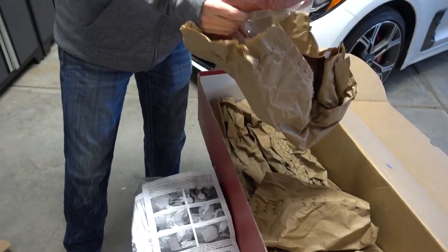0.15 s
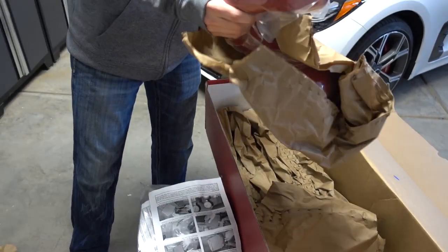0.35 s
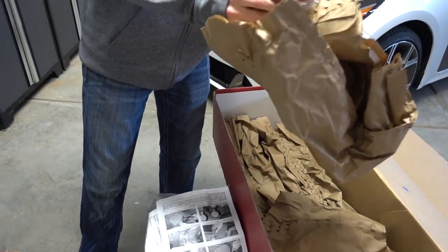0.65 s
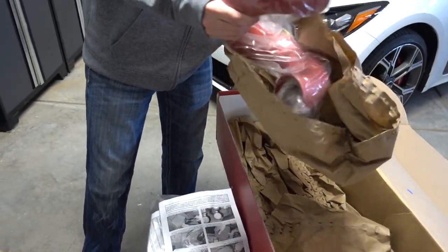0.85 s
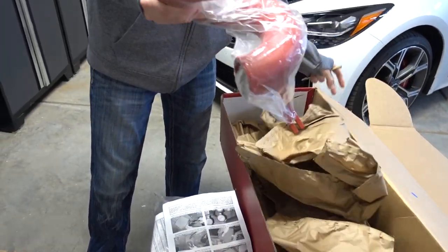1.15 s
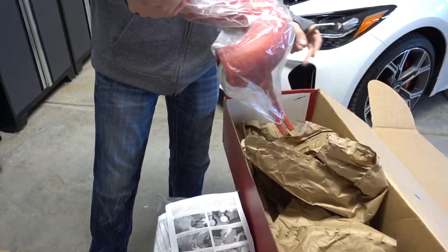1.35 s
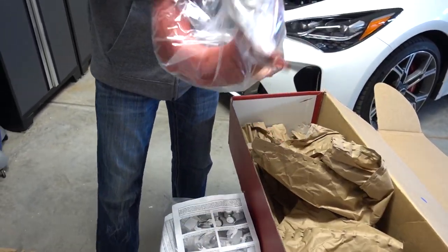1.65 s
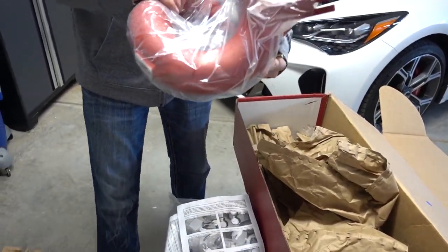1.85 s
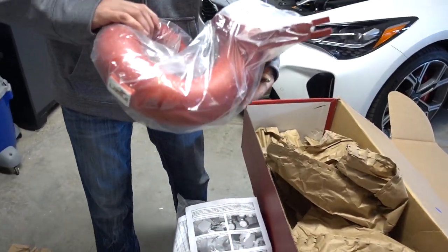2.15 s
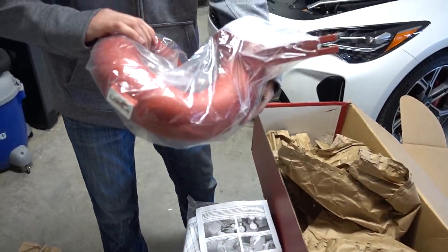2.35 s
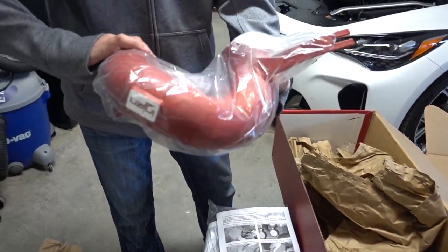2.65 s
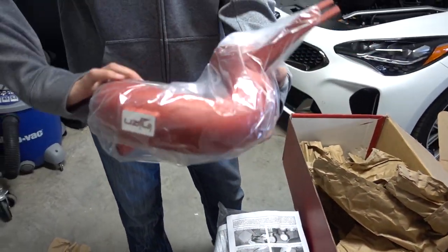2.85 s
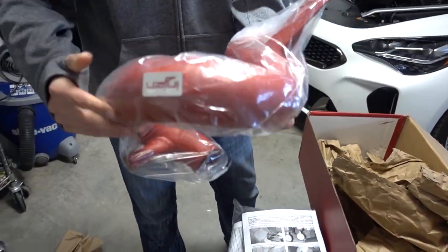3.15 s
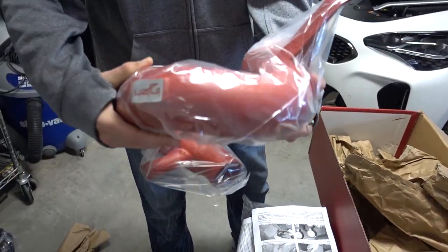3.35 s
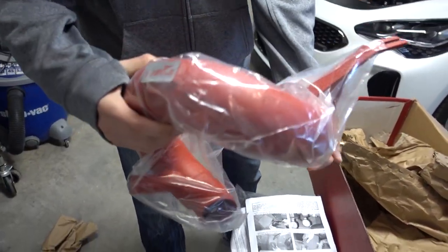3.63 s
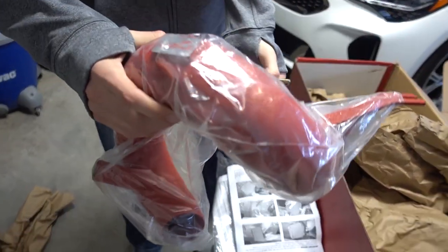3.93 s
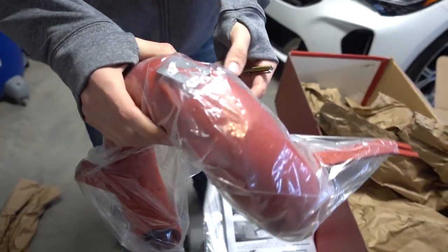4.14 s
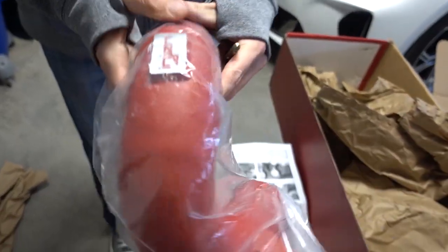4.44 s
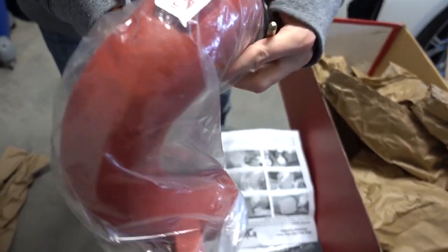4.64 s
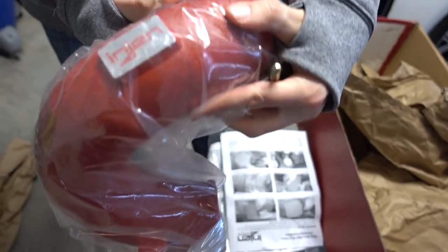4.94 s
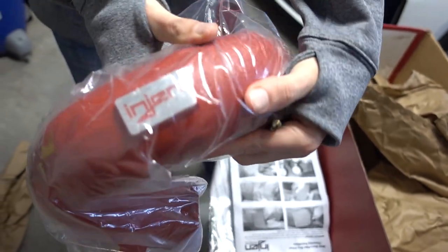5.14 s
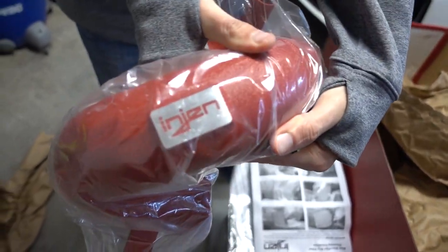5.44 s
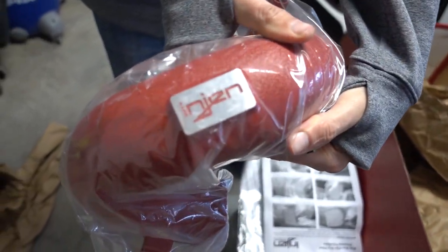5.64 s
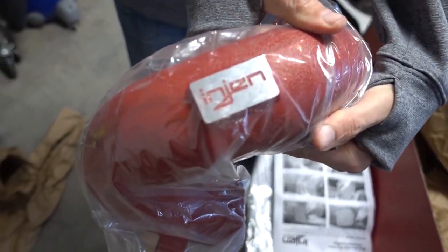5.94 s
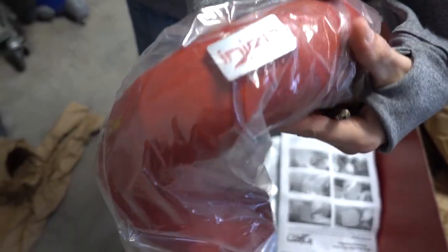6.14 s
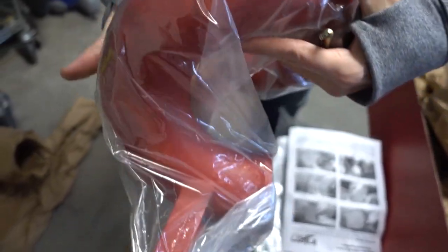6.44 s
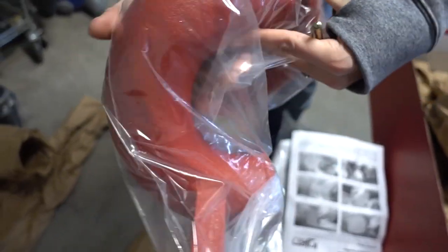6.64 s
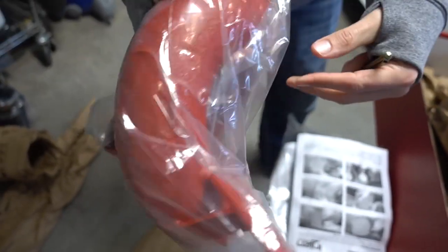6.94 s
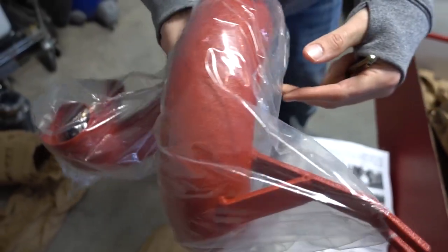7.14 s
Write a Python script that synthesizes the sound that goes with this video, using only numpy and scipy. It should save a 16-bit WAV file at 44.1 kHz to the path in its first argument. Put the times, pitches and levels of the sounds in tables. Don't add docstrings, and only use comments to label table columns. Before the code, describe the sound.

A close stereo pickup in a garage with a hard concrete floor and a short, dull reverberation. From 0 to about 1.1 s stiff packing paper is pulled off a pipe: loud, dense, coarse crackle with low-pitched snaps, surging repeatedly, with a slightly hollow air-pocket colour around 0.6 and 0.9 s. Soft thumps at about 1.2 and 1.3 s land in a cardboard box, which hums briefly; the rustle dies away by 1.6 s. Much quieter, thin plastic film ticks and crinkles from 1.7 to 2.7 s, grows brighter around 3.0 to 3.5 s, and nearly stops near 4 s. Crinkling resumes from 4.3 to 5.3 s, with another burst at 5.6 s and a lull just before 6 s. A firm twist brings the sharpest plastic snaps at 6.3 and 6.6 to 6.8 s, with slight dull bumps, a last snap near 7.1 s, then sparse ticks. Faint motor hum and air rumble continue throughout.

```python
import sys
import numpy as np
from scipy import signal
from scipy.fft import rfft, irfft, next_fast_len
from scipy.io import wavfile
from scipy.ndimage import uniform_filter1d

SR = 44100
rng = np.random.default_rng(int(sys.argv[2]) if len(sys.argv) > 2 else 0)


def level_to_linear(level):
    exponent = np.asarray(level, float) / 20
    return 10 ** exponent


def inscribe(sig):
    pcm = np.round(np.clip(np.atleast_2d(sig).T, -1, 1) * 32767)
    wavfile.write(sys.argv[1], SR, pcm.astype(np.int16))


N = 321224
PAPER_GONE_S = 1.6


def rms_one(x):
    return x / np.sqrt(np.mean(x ** 2) + 1e-20)


def at_hz(points, hz):
    point_hz, point_db = np.array(points)[:, 0], np.array(points)[:, 1]
    return np.interp(np.log(hz), np.log(point_hz), point_db)


def drift(rate):
    r = np.exp(-40 * np.pi * rate / SR)
    slow = signal.lfilter([1], [1, -2 * r, r * r], rng.standard_normal(N // 20 + 2002))[2000:]
    return np.interp(np.arange(N) / 20, np.arange(len(slow)), rms_one(slow))


def resonate(x, hz, width_hz):
    r = np.exp(-np.pi * width_hz / SR)
    poles = [1, -2 * r * np.cos(2 * np.pi * hz / SR), r * r]
    return signal.lfilter([(1 - r * r) / 2, 0, (r * r - 1) / 2], poles, x)


def coloured(x, db_at):
    size = next_fast_len(N)
    hz = np.maximum(np.arange(size // 2 + 1) * SR / size, 10)
    return irfft(rfft(x, size) * level_to_linear(db_at(hz)), size)[..., :N]


def handling():
    # peak t/s, crackle level/dB, rise [s per 10 dB], fall [s per 10 dB], weight/dB
    pulls = [(.02, -21, .012, .03, -4), (.06, -29, .05, .25, 0), (.236, -25.5, .08, .085, 3),
             (.33, -35, .1, .12, -3), (.492, -28, .004, .09, 1), (.6, -26, .06, .08, 2),
             (.68, -24, .03, .15, 1), (.77, -28, .1, .2, -4), (.908, -22, .2, .18, -4),
             (1.16, -27.5, .05, .22, -5), (1.33, -31, .04, .1, -5), (1.41, -33, .3, .092, -3),
             (1.688, -49, .02, .07, 2)]
    grips = [(1.849, -47, .06, .09, 4), (1.93, -46, .02, .07, -2), (2.06, -47, .1, .05, 1),
             (2.275, -46, .12, .035, -2), (2.45, -54, .8, .25, 3), (2.6, -45, .13, .16, -2),
             (2.625, -41, .025, .05, 7), (3.061, -34, .11, .16, -1), (3.187, -36, .03, .06, 1),
             (3.38, -35, .1, .2, 0), (4.115, -65, .02, .1, -9), (4.153, -53.5, .004, .16, 9),
             (4.44, -41.5, .11, .3, 0), (4.554, -38, .08, .12, 2), (4.775, -36.5, .06, .2, -1),
             (5.089, -43, .5, .3, 0), (5.163, -39, .03, .03, 0), (5.48, -48, .03, .2, 4),
             (5.55, -39, .025, .14, 1), (5.964, -54, .014, .025, 2), (6.077, -39.5, .02, .06, -4),
             (6.198, -43, .1, .2, 0), (6.44, -36.5, .03, .8, 3), (6.55, -36, .12, .05, 0),
             (6.61, -31, .02, .06, 2), (6.7, -31, .13, .15, 0), (6.824, -34.5, .2, .09, 1),
             (7.25, -52, 1.5, .8, 0)]
    move_s = .55
    box_landing_s, box_body_db = 1.1, 8
    t = np.arange(0, N + 64, 64) / SR
    s, db, rise, fall, weight = np.transpose(pulls + grips)[:, :, None]
    rising = 10 * np.maximum(s - t, 0) / rise
    fading = 10 * np.maximum(t - s, 0) / fall
    lead = level_to_linear(6 * (db - rising - fading - 10 * ((t - s) / move_s) ** 4)) + 1e-40
    total = lead.sum(0)
    paper = np.arange(len(s))[:, None] < len(pulls)
    body = np.where(paper, -4.5 + box_body_db * (s > box_landing_s), -5.5) + weight
    sizzle = np.where(paper, -1.5, 1.5) - .9 * weight
    sizzle = sizzle - .5 * np.minimum(fading, 40) - .3 * np.minimum(rising, 40)
    level = 20 / 6 * np.log10(total)
    curves = (level, (lead * body).sum(0) / total, (lead * sizzle).sum(0) / total)
    return [np.interp(np.arange(N) / SR, t, curve) for curve in curves]


def paper_creases():
    # t/s, peak level/dB, f/Hz, length/ms
    paper_flips = [(0.008, -13, 3000, 0.85), (0.0209, -13, 2800, 0.75), (0.0395, -16, 3100, 0.77),
                   (0.0561, -8, 3600, 0.32), (0.1005, -17, 2600, 0.48), (0.1613, -13, 3200, 0.39),
                   (0.1841, -14, 2700, 0.6), (0.1919, -17, 3000, 0.48), (0.2098, -9, 2100, 0.55),
                   (0.2151, -7, 2800, 0.8), (0.2323, -12, 2400, 0.46), (0.2822, -19, 2200, 0.83),
                   (0.3022, -19, 2200, 0.31), (0.3398, -19, 2900, 0.33), (0.4718, -29, 2400, 0.83),
                   (0.4898, -18, 3200, 0.58), (0.5058, -20, 4700, 0.51), (0.5101, -18, 3300, 0.54),
                   (0.5545, -14, 4500, 0.58), (0.5825, -13, 2700, 0.37), (0.5993, -11, 2600, 0.92),
                   (0.6051, -11, 4200, 0.46), (0.6299, -12, 3700, 0.51), (0.6692, -12, 2400, 0.61),
                   (0.6737, -11, 2000, 0.83), (0.6956, -11, 3600, 0.55), (0.7289, -13, 2800, 0.33),
                   (0.7665, -12, 3600, 0.41), (0.7788, -13, 5600, 0.45), (0.7925, -12, 2700, 0.33),
                   (0.8389, -9, 5400, 0.36), (0.8719, -12, 3900, 0.39), (0.8781, -12, 5500, 0.42),
                   (0.9366, -8, 5400, 0.24), (0.9552, -9, 6100, 0.27), (0.9684, -11, 6600, 0.62),
                   (1.0007, -14, 5700, 0.65), (1.3153, -21, 3700, 0.7), (1.3824, -20, 3800, 0.6),
                   (1.422, -22, 3600, 0.53), (1.4419, -27, 2400, 0.91), (1.4971, -27, 4500, 0.33),
                   (1.5043, -29, 3800, 0.53), (1.5386, -32, 2700, 0.48)]
    return paper_flips


def film_creases():
    # t/s, peak level/dB, f/Hz, length/ms
    film_flips = [(6.0077, -36, 6200, 0.43), (6.0224, -39, 3700, 0.51), (6.0408, -27, 3500, 0.5),
                  (6.0543, -26, 5800, 0.18), (6.0641, -15, 6100, 0.19), (6.0844, -19, 4900, 0.23),
                  (6.1181, -25, 4800, 0.27), (6.1285, -22, 8300, 0.3), (6.1429, -20, 8000, 0.25),
                  (6.1463, -19, 10000, 0.31), (6.1539, -18, 5200, 0.32), (6.1774, -24, 4800, 0.5),
                  (6.2412, -29, 5800, 0.29), (6.2579, -17, 6600, 0.27), (6.283, -22, 7500, 0.18),
                  (6.2942, -19, 5700, 0.79), (6.2986, -16, 5200, 0.23), (6.3148, -8, 6800, 0.2),
                  (6.3425, -25, 3400, 0.61), (6.3496, -22, 6900, 0.5), (6.3838, -18, 4300, 0.26),
                  (6.4033, -21, 5500, 0.11), (6.4347, -19, 3300, 0.68), (6.4485, -13, 5900, 0.26),
                  (6.4519, -18, 6000, 0.44), (6.5988, -8, 5800, 0.22), (6.6222, -9, 7900, 0.21),
                  (6.6526, -10, 5000, 0.24), (6.6736, -9, 6500, 0.23), (6.6948, -13, 5000, 0.38),
                  (6.7307, -9, 4400, 0.33), (6.7431, -13, 4200, 0.48), (6.7792, -13, 5500, 0.37),
                  (6.7871, -12, 3800, 0.27), (6.7987, -12, 2900, 0.31), (6.8023, -11, 3100, 0.33),
                  (6.8154, -14, 4900, 0.27), (6.8936, -16, 4100, 0.34), (6.9215, -26, 3900, 0.35),
                  (7.0024, -18, 5500, 0.31), (7.0086, -23, 8300, 0.12), (7.0439, -18, 4400, 0.51),
                  (7.0692, -8, 5800, 0.3), (7.0978, -32, 5500, 0.33), (7.1326, -33, 3500, 0.46),
                  (7.1542, -27, 5800, 0.3), (7.1915, -26, 5100, 0.33), (7.234, -32, 5800, 0.23),
                  (7.255, -32, 3300, 0.36), (7.2787, -21, 7500, 0.3),
                  (5.0031, -20, 4600, 0.3), (5.0152, -23, 5100, 0.43), (5.0199, -23, 4500, 0.24),
                  (5.0407, -23, 6500, 0.35), (5.0437, -21, 4800, 0.27), (5.0766, -15, 5400, 0.23),
                  (5.0852, -22, 6000, 0.32), (5.0989, -16, 6500, 0.28), (5.1193, -19, 8500, 0.42),
                  (5.1373, -20, 6300, 0.16), (5.1463, -20, 4200, 0.32), (5.1665, -21, 5500, 0.35),
                  (5.177, -22, 7800, 0.34), (5.2163, -22, 6500, 0.25), (5.23, -22, 5200, 0.51),
                  (5.2375, -27, 7800, 0.68), (5.2443, -24, 8200, 0.23), (5.2679, -12, 6600, 0.18),
                  (5.3195, -21, 7000, 0.18), (5.3419, -31, 3900, 0.76), (5.352, -28, 4700, 0.55),
                  (5.3958, -25, 7800, 0.23), (5.418, -27, 5200, 0.35), (5.4316, -21, 10400, 0.19),
                  (5.4637, -32, 3500, 0.7), (5.5292, -29, 4900, 0.85), (5.5749, -17, 8500, 0.24),
                  (5.5793, -20, 4700, 0.33), (5.585, -16, 6600, 0.37), (5.6242, -22, 5300, 0.28),
                  (5.638, -22, 6500, 0.3), (5.654, -22, 4800, 0.38), (5.7018, -27, 2600, 0.59),
                  (5.7134, -24, 8200, 0.3), (5.7672, -36, 3800, 0.64), (5.7833, -35, 3700, 0.42),
                  (5.7871, -22, 6700, 0.37), (5.8088, -28, 3200, 0.2), (5.8842, -36, 3800, 0.22),
                  (5.9546, -34, 3300, 0.48),
                  (2.8592, -36, 2800, 0.69), (2.8714, -26, 6800, 0.23), (2.8917, -32, 5200, 0.35),
                  (2.9122, -31, 5000, 0.62), (2.9175, -26, 4300, 0.36), (2.9329, -27, 6200, 0.46),
                  (2.9597, -28, 6200, 0.45), (2.9851, -19, 6200, 0.17), (3.0181, -19, 5500, 0.24),
                  (3.057, -19, 5700, 0.6), (3.1157, -22, 6400, 0.62), (3.1333, -21, 6800, 0.44),
                  (3.1368, -18, 7800, 0.29), (3.189, -23, 7500, 0.43), (3.2277, -23, 7600, 0.24),
                  (3.2379, -26, 4300, 0.34), (3.2477, -25, 7000, 0.24), (3.3017, -18, 5900, 0.23),
                  (3.3082, -27, 5500, 0.39), (3.3561, -18, 6500, 0.22), (3.3628, -21, 8100, 0.62),
                  (3.3764, -20, 3400, 0.28), (3.4687, -15, 9200, 0.27), (3.4744, -25, 4500, 0.41),
                  (3.4801, -24, 3300, 0.51), (3.5383, -26, 4000, 0.33), (3.5891, -30, 4900, 0.4),
                  (3.662, -34, 3500, 0.49), (3.6773, -32, 3000, 0.36), (3.7023, -37, 3500, 0.64),
                  (3.7658, -29, 4400, 0.19), (3.7765, -31, 3200, 0.4), (3.8472, -39, 2400, 0.55),
                  (3.8647, -37, 5100, 0.76), (3.8705, -30, 3300, 0.31), (3.9139, -46, 2700, 0.6),
                  (1.6834, -32, 3500, 0.8), (1.7311, -30, 4000, 0.35), (1.8465, -23, 6400, 0.13),
                  (1.8918, -29, 4000, 0.45), (1.9176, -19, 7500, 0.24), (1.9207, -19, 7700, 0.24),
                  (1.9251, -27, 5500, 0.28), (1.9511, -27, 5200, 0.35), (1.9549, -27, 8100, 0.23),
                  (1.9698, -24, 6900, 0.17), (1.9959, -21, 4400, 0.33), (2.0037, -24, 3400, 0.33),
                  (2.0287, -19, 6500, 0.24), (2.0357, -29, 8000, 0.32), (2.0525, -25, 5700, 0.5),
                  (2.0572, -27, 3200, 0.36), (2.0797, -28, 6900, 0.26), (2.124, -19, 6800, 0.37),
                  (2.1312, -20, 8000, 0.13), (2.164, -33, 4600, 0.28), (2.2458, -33, 7000, 0.55),
                  (2.2674, -27, 4200, 0.29), (2.2736, -27, 7300, 0.43), (2.3182, -25, 4300, 0.21),
                  (2.3297, -29, 3000, 0.33), (2.3557, -29, 8200, 0.17), (2.4121, -30, 4500, 0.4),
                  (2.492, -32, 3700, 0.34), (2.5149, -28, 4000, 0.34), (2.5309, -26, 4600, 0.3),
                  (2.5668, -21, 5500, 0.15), (2.5978, -26, 6700, 0.33), (2.6204, -21, 3000, 0.34),
                  (2.6412, -20, 7000, 0.27), (2.6991, -25, 4000, 0.35), (2.741, -28, 3900, 0.37),
                  (4.0031, -49, 2300, 0.72), (4.1512, -31, 3900, 0.52), (4.1581, -38, 4200, 0.94),
                 (4.2663, -38, 5000, 0.9), (4.2864, -36, 4700, 0.44), (4.3094, -38, 6900, 0.71),
                 (4.3143, -34, 4700, 0.27), (4.346, -32, 3500, 0.46), (4.3511, -30, 6300, 0.55),
                 (4.3866, -28, 6100, 0.42), (4.4027, -25, 10900, 0.42), (4.412, -25, 4400, 0.38),
                 (4.4651, -23, 7400, 0.34), (4.4766, -23, 5100, 0.42), (4.4873, -24, 3100, 0.59),
                 (4.5094, -25, 3400, 0.27), (4.5335, -18, 5100, 0.23), (4.543, -22, 5600, 0.33),
                 (4.5488, -18, 4900, 0.43), (4.5589, -21, 5700, 0.4), (4.5775, -20, 5500, 0.37),
                 (4.6083, -25, 5100, 0.18), (4.6806, -34, 2400, 0.59), (4.7071, -32, 5700, 0.56),
                 (4.7143, -26, 3200, 0.29), (4.7478, -20, 3300, 0.29), (4.7663, -20, 6200, 0.57),
                 (4.7756, -15, 5000, 0.4), (4.8072, -20, 4300, 0.3), (4.8332, -16, 4200, 0.29),
                 (4.8641, -17, 6200, 0.21), (4.8895, -16, 6600, 0.31), (4.9669, -24, 4000, 0.5),
                 (4.9979, -21, 8000, 0.25),
                  (6.495, -21, 4500, .9), (6.519, -19, 4400, .6), (6.531, -21, 6500, .6),
                   (6.552, -19, 5200, .7), (6.589, -20, 5000, .6)]
    return film_flips


def small_creases(level_db):
    per_s, facet_octaves = 100, .5
    luck = rng.random((round(per_s * N / SR), 5))
    s = luck[:, 0] * (N - 1) / SR
    peak_db = -34 + (level_db[(s * SR).astype(int)] + 40) - 2.3 * np.log(luck[:, 1] + .1)
    facet_hz = np.where(s < PAPER_GONE_S, 2700, 5000)
    hz = facet_hz * 2 ** (2 * facet_octaves * (luck[:, 2] + luck[:, 3] - 1))
    length_ms = .25 + .7 * luck[:, 4]
    return list(zip(s, peak_db, np.clip(hz, 1000, 10000), length_ms))


def snaps(table, q, tear, edge_db, gain_db):
    clean_flip_ms = .17
    out, t = np.zeros((2, N + 600)), np.arange(600) / SR
    lucks = rng.random((len(table), 3))
    noises = rng.standard_normal((len(table), 600))
    for (s, peak_db, hz, ms), luck, noise in zip(table, lucks, noises):
        tear_s = tear * max(ms - clean_flip_ms, .02) / 1000
        push = .5 * noise * np.exp(-t / tear_s)
        push[0] = 1
        facet = resonate(resonate(push, .85 * hz, hz / q), hz, 1.1 * hz)
        edge = resonate(resonate(push, min((1.6 + luck[0]) * hz, 14000), 4000), 11000, 16000)
        edge_gain = level_to_linear(edge_db - 6.0 * luck[2])
        snap = facet / np.abs(facet).max() - edge_gain * edge / np.abs(edge).max()
        snap = snap * np.sqrt(ms * SR / 2000 / np.sum(snap ** 2))
        mid_side = np.array([[1], [1.3 * (luck[1] - .5)]])
        at = round(s * SR) - 1
        out[:, at:at + 600] += level_to_linear(peak_db + gain_db) * snap * mid_side
    return out[:, :N]


def avalanches(level_db, creases, per_s, after_db, settle_s):
    kicks = (rng.random(N) < per_s / SR) * np.minimum(rng.exponential(.4, N), .7)
    for s, peak_db, *_ in creases:
        at = round(s * SR)
        kicks[at] += min(level_to_linear(peak_db - level_db[at] + after_db), 3.0)
    r = np.exp(-1 / (settle_s * SR))
    return .9 + signal.lfilter([1], [1, -r], kicks)


def crackle(level, body, sizzle, creases, per_s, spread_db, reach, q, rub_db):
    # f/Hz, level/dB per Hz
    sheet_colour = [(32, -49), (55, -49), (114, -11.5), (243, -5), (390, -9.5), (569, -1.5), (870, -6.5),
                    (1300, -2.5), (2900, -2.5), (9010, -14), (15500, -23)]
    clump = avalanches(level, creases, per_s=2.0, after_db=-25.5, settle_s=0.006)
    born = rng.random(N) < per_s / SR
    sizes = born * level_to_linear(spread_db * np.minimum(rng.exponential(1, N), 3.5)) * rng.choice([-1, 1], N)
    place = rng.uniform(7.3, 13.26, N)
    aside = np.stack([np.ones(N), rng.standard_normal(N)])
    rub = level_to_linear(rub_db) * rng.standard_normal((2, 2, N))
    patches = [1.8 * drift(16.0) for _ in range(7)]
    thin_db = np.where(np.arange(N) / SR < PAPER_GONE_S, -2.3, 1.5)
    out, power = np.zeros((2, N)), 0
    for k, hz in enumerate(np.geomspace(65, 15000, 21)):
        hits = rms_one(sizes * np.exp(-.5 * ((place - np.log2(hz)) / reach) ** 2))
        push = clump ** np.clip(hz / 3000, .6, 1) * (hits * aside + rub[k % 2])
        patch = rms_one(resonate(resonate(push, hz, hz / q), hz, hz))
        low, high = np.clip(np.log2([2300 / hz, hz / 4500]), 0, 1)
        tilt_db = low * (body + 4.0) + high * (sizzle + 4.5)
        facet_db = patches[k // 3] + thin_db * np.clip(np.log2(hz / 2600), -1, 1)
        gain = np.sqrt(hz) * level_to_linear(at_hz(sheet_colour, hz))
        out += patch * gain * level_to_linear(tilt_db + facet_db)
        power += gain ** 2
    return out * level_to_linear(level + 3.4) / np.sqrt(power)


def air_pocket(near):
    # t/s, level/dB
    openness = [(0, -24), (.23, -9.5), (.45, -15.5), (.6, 1.5), (.78, -6), (.86, 7), (1.0, -6), (1.2, -4),
                (1.4, -30)]
    squeezes = (.8, 1.0, 1.22)
    pocket_hz, width_hz, flutter_db = 590, 144, 5.5
    open_db = np.interp(np.arange(N) / SR, *np.transpose(openness))
    out = np.zeros((2, N))
    for k in squeezes:
        gain_db = open_db + flutter_db * drift(9.0) - 4.5 - 15 * abs(k - 1)
        out += resonate(near * level_to_linear(gain_db), k * pocket_hz, width_hz)
    return out


def thumps():
    # t/s, peak level/dB, f/Hz
    landings = [(.497, -36, 256), (0.942, -36.5, 147), (1.18, -28, 210), (1.332, -23.5, 202),
                (2.618, -41, 590), (3.171, -43, 143), (3.776, -46, 600), (4.776, -39, 550),
                (6.35, -50, 300), (6.434, -36, 600), (6.597, -35, 450), (6.72, -45, 162)]
    box_hz, box_ring_s = 120, .045
    out, t = np.zeros(N + 8000), np.arange(8000) / SR
    box = level_to_linear(-11) * np.sin(2 * np.pi * box_hz * t) * np.exp(-t / box_ring_s)
    onset = 1 - np.exp(-t / .003)
    for s, peak_db, hz in landings:
        at = round(s * SR)
        sagging = t * np.exp(-t / .09)
        push = np.sin(2 * np.pi * hz * sagging) * np.exp(-t * hz / 1.8)
        out[at:at + 8000] += level_to_linear(peak_db + 2.5) * (push + box) * onset
    return out[:N] * [[1], [0]]


def garage(x):
    t60_s, wall_db, cut_hz = .6, -13.5, 2500
    floor_s, floor_db = .0074, -21
    t = np.arange(SR) / SR
    dense = rng.standard_normal((2, SR)) * (t > .011)
    dull = signal.lfilter(*signal.butter(1, cut_hz, fs=SR), dense)
    tail = dull * level_to_linear(-60 * t / t60_s)
    tail *= level_to_linear(wall_db) / np.sqrt(np.sum(tail[0] ** 2))
    tail[:, round(floor_s * SR)] = level_to_linear(floor_db)
    return signal.fftconvolve(x[None], tail, axes=1)[:, :N]


def air():
    # f/Hz, level/dB per Hz
    air_colour = [(20, -11), (45, -4), (90, -7.5), (200, -4.5), (600, -13), (1000, -21), (3000, -19.5),
                  (8000, -30.5), (15000, -37.5)]
    # f/Hz, width/Hz, level/dB
    hum_lines = [(82, 12, -67.5), (119.6, 5.5, -64), (599, 40, -73)]
    noise = rng.standard_normal((2, N))
    out = level_to_linear(-60.5) * rms_one(coloured(noise, lambda hz: at_hz(air_colour, hz)))
    for hz, width_hz, level_db in hum_lines:
        hum = resonate(resonate(noise[1], hz, width_hz), hz, 2.3 * width_hz)
        out[0] += level_to_linear(level_db) * rms_one(hum)
    return out


def microphone_pair(mid, side):
    # f/Hz, side-mid level/dB
    pair_width = [(60, -40), (180, -33), (550, -21), (1650, -11), (4970, -5), (15000, -2)]
    # t/s, left-right level/dB
    hand_place = [(0.0, -0.5), (1.07, -1.0), (3.2, 1), (4.18, -1.0), (4.44, 1), (5.84, -1), (5.92, -2),
                  (7.28, 1)]
    t = np.arange(N) / SR
    lean = np.tanh(np.interp(t, *np.transpose(hand_place)) * 0.21)
    late = np.imag(signal.hilbert(mid, next_fast_len(N)))[:N] * .55 * drift(3.0)
    side = coloured(1.03 * side + lean * mid + late, lambda hz: at_hz(pair_width, hz) - .3)
    return np.stack([mid + side, mid - side])


def scene():
    level, body, sizzle = handling()
    paper, film, small = paper_creases(), film_creases(), small_creases(level)
    near = crackle(level, body, sizzle, paper + film + small,
                   per_s=2500.0, spread_db=1.1, reach=0.45, q=2.2, rub_db=0.3)
    near += air_pocket(near)
    near += snaps(paper, q=1.6, tear=3.5, edge_db=-16, gain_db=0.1)
    near += snaps(film, q=1.9, tear=3.6, edge_db=-16.5, gain_db=0.3)
    near += snaps(small, q=1.8, tear=3.0, edge_db=-14, gain_db=0)
    mid, side = near + thumps() + garage(near[0]) + air()
    return microphone_pair(mid, side)


def top_cut(x):
    return signal.sosfilt(signal.butter(12, 16980, fs=SR, output="sos"), x)


def record(dry):
    top_hz, leak_db = 15850, -38
    squelch_hz, squelch_db = 14500, -76.5
    x = signal.sosfilt(signal.butter(2, 30, "high", fs=SR, output="sos"), dry)
    x = .7 * np.tanh(x / .7)
    x = coloured(x, lambda hz: leak_db * np.clip((hz - top_hz) / 150, 0, 1) - 60 * (hz > 16950))
    top = coloured(x, lambda hz: -60 * np.clip((squelch_hz - hz) / 400, 0, 2) ** 2)
    faint = uniform_filter1d(top.mean(0) ** 2, size=1024) < level_to_linear(2 * squelch_db)
    x = x - top * uniform_filter1d(1.0 * faint, size=512)
    return top_cut(x)


dry = scene()
out = record(dry)
inscribe(out)
```